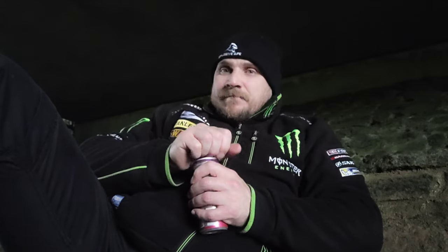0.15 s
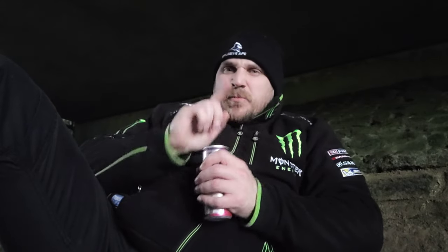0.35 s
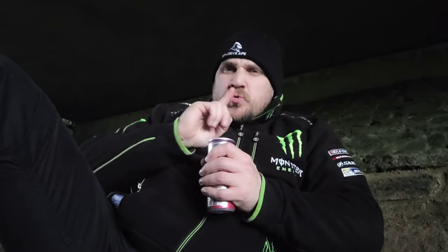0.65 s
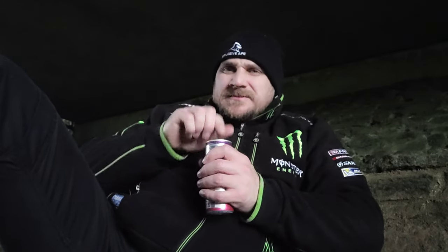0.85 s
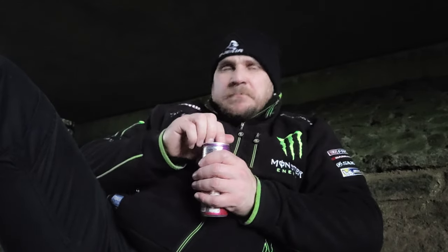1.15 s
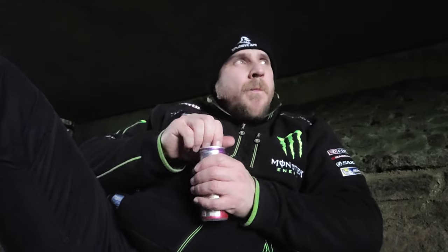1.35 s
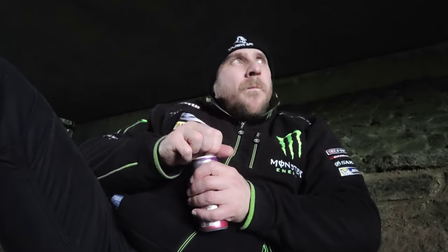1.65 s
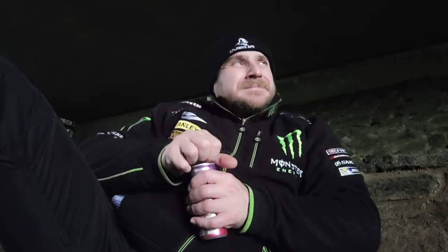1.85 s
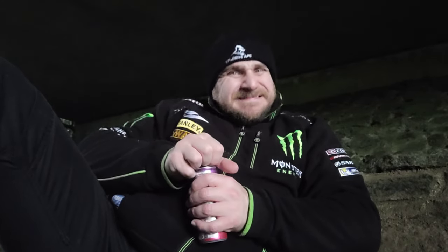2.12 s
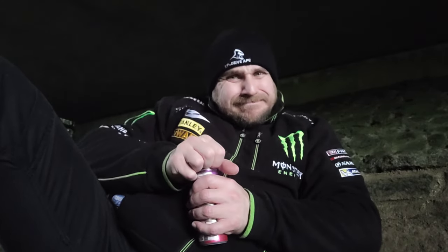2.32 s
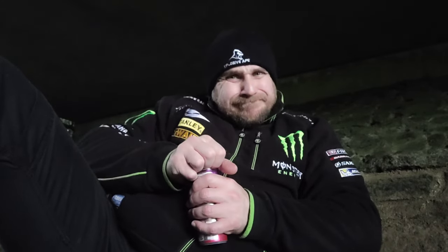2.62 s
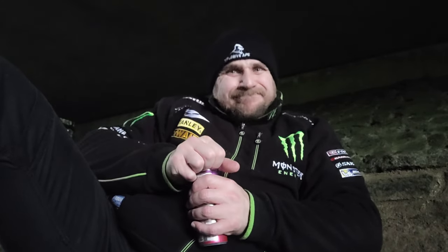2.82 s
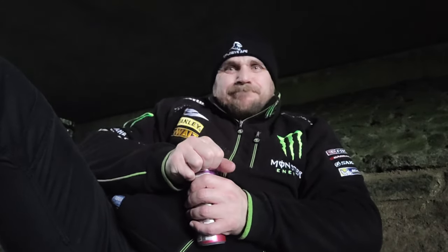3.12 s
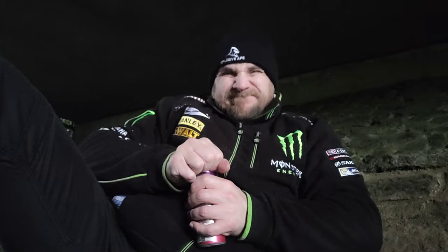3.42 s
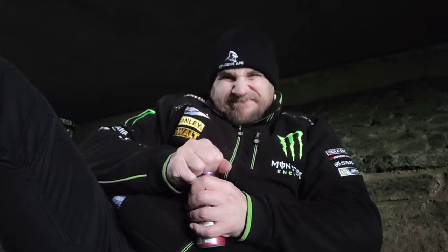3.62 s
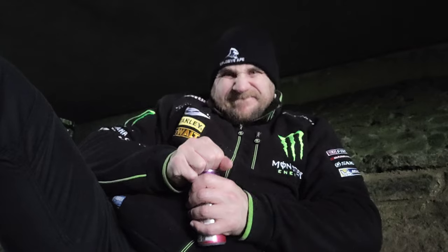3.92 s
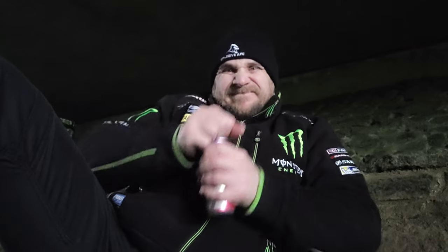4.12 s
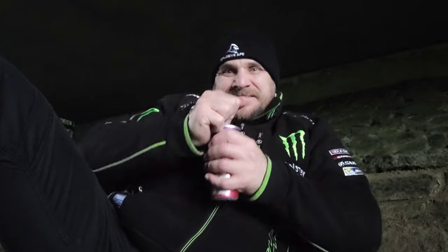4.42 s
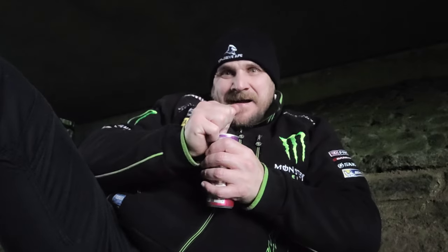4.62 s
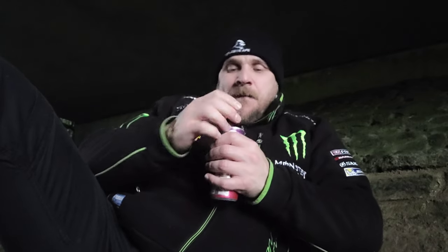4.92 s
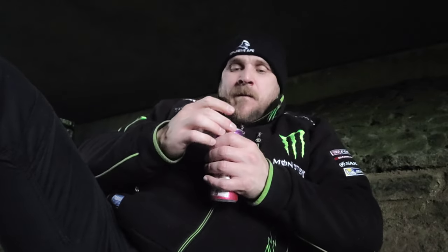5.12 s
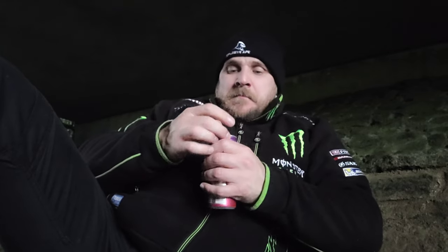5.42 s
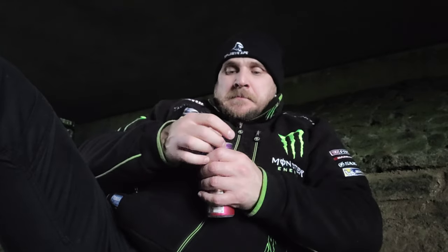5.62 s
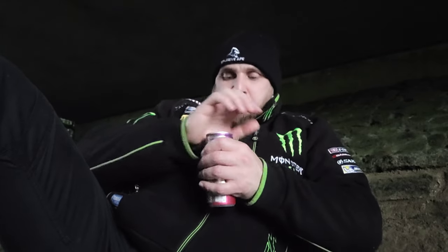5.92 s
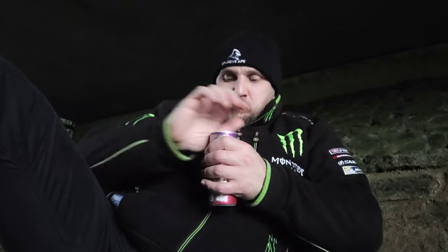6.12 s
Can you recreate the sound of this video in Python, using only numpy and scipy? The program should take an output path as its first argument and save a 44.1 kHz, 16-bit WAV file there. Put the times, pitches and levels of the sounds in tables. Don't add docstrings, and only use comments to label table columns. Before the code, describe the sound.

Sharp can-tab snaps, a brief gas hiss and a tearing crackle ring close by, slapping off stone over distant low road noise.

```python
import sys
import numpy as np
from scipy import signal
from scipy.fft import rfft, irfft
from scipy.io import wavfile

SR = 44100
rng = np.random.default_rng(int(sys.argv[2]) if len(sys.argv) > 2 else 0)


def generate_wav(signal):
    frames = np.transpose(np.atleast_2d(signal))
    scaled = np.clip(frames, -1, 1) * 32767
    pcm = np.round(scaled).astype(np.int16)
    wavfile.write(sys.argv[1], SR, pcm)


def gain_from_decibels(decibels):
    exponent = np.asarray(decibels, float) / 20
    return 10 ** exponent


N = 276066


def rms_one(x):
    return x / np.sqrt(np.mean(x ** 2) + 1e-20)


def at_hz(points, hz):
    table = np.array(points)
    return np.interp(np.log(hz), np.log(table[:, 0]), table[:, 1])


def pan(db):
    return gain_from_decibels(np.array([[.5], [-.5]]) * db)


def drift(rate):
    r = np.exp(-80 * np.pi * rate / SR)
    settled = signal.lfilter([1], [1, -2 * r, r * r], rng.standard_normal(N // 40 + 2002))[2000:]
    return np.interp(np.arange(N) / 40, np.arange(len(settled)), rms_one(settled))


def envelope(start, rise, hold, level_db, fade_db):
    t = np.arange(N) / SR - start
    swell = np.sin(np.pi / 2 * np.clip(t / rise, 0, 1)) ** 2
    return swell * gain_from_decibels(level_db - fade_db * np.maximum(t - rise - hold, 0))


def coloured(spectrum, likeness):
    mid, side = rfft(rng.standard_normal((2, N)))
    hz = np.maximum(np.arange(len(mid)) * SR / N, 1)
    alike = np.clip(at_hz(likeness, hz), -1, 1)
    inside = (hz >= spectrum[0][0]) * (hz <= spectrum[-1][0])
    gain = gain_from_decibels(at_hz(spectrum, hz)) * inside
    pair = np.sqrt(1 + alike) * mid + np.sqrt(1 - alike) * side * [[1], [-1]]
    return rms_one(irfft(gain * pair, N))


# (closest [s], time to double the distance [s], rumble [dB], roar [dB], hiss [dB])
PASSES = [
    (0.1, 0.73, -60, -49, -59),
    (0.62, 0.66, -67, -44, -71),
    (2.3, 0.6, -56.5, -49.5, -73.5),
    (4.6, 0.91, -63.5, -65.5, -61),
    (6.0, 0.87, -47, -40.5, -51.5),
]
# (time [s], half length [s], rumble [dB])
SURGES = [(0.24, 0.058, -42), (1.09, 0.13, -47), (1.743, 0.3, -45.5), (2.49, 0.16, -42.5),
          (3.42, 0.15, -47.5), (3.828, 0.16, -46), (4.353, 0.11, -45.5)]


def road_gains():
    t = np.arange(N) / SR
    power = np.zeros((3, N))
    for closest, width, *levels_db in PASSES:
        power += gain_from_decibels(np.array(levels_db))[:, None] ** 2 / (1 + 3 * ((t - closest) / width) ** 2)
    for s, half, db in SURGES:
        power[0] += gain_from_decibels(2 * db) * np.exp(-((t - s) / half) ** 2)
    return power


# (frequency [Hz], level [dB per Hz])
ENGINE_RUMBLE = [(20, -47), (25, -29.5), (31, -23), (39, -10.5), (50, 1), (62, -2), (80, -2.5), (105, -3.5),
                 (130, -12.5), (170, -17.5), (200, -23.5), (260, -45.5)]
# (frequency [Hz], level [dB per Hz])
TYRE_ROAR = [(76, -29.5), (130, -1), (182, -8), (220, 1.5), (311, -3), (335, -5), (360, -8), (499, -8.5),
             (596, -9.5), (843, -5.5), (1600, -21), (2080, -56.5), (3520, -120)]
# (frequency [Hz], level [dB per Hz])
HIGH_HISS = [(760, -17.5), (1300, -3), (2000, -6.5), (2440, -12.5), (3170, -19), (4500, -21), (5800, -22),
             (7300, -26), (8100, -38), (8700, -37), (10000, -41.5), (15000, -39), (16000, -41.5)]
# (frequency [Hz], width [Hz], level [dB])
IDLE_DRONE = (56, 2.4, -47)
# (frequency [Hz], left-right likeness [-1 to 1])
ROAD_ALIKE = [(60, 0.85), (130, 1), (290, 0.82), (640, 0.27), (1410, -0.3), (3100, 0.054), (6820, -0.043),
              (15000, -0.13)]
# (engine rumble [dB], tyre roar [dB], high hiss [dB])
ROAD_BED = (-48, -49, -63.5)


def traffic():
    hz, width, drone_db = IDLE_DRONE
    r = np.exp(-np.pi * width / SR)
    resonance = [1, -2 * r * np.cos(2 * np.pi * hz / SR), r * r]
    drone = gain_from_decibels(drone_db) * rms_one(signal.lfilter([1, 0, -1], resonance, rng.standard_normal(N)))
    passing = road_gains()
    low, middle, high = np.sqrt(gain_from_decibels(np.array(ROAD_BED))[:, None] ** 2 + passing * [[1], [1], [0]])
    rumble = low * gain_from_decibels(drift(4.6) + 1.5) * coloured(ENGINE_RUMBLE, ROAD_ALIKE)
    roar = middle * gain_from_decibels(0.36 * drift(4.0) - 0.57) * coloured(TYRE_ROAR, ROAD_ALIKE)
    hiss = high * gain_from_decibels(.5 * drift(3.2) + 3.5) * coloured(HIGH_HISS, ROAD_ALIKE)
    dull = signal.butter(1, 3500, fs=SR, output="sos")
    tyres = np.sqrt(passing[2]) * gain_from_decibels(3.0) * signal.sosfilt(dull, coloured(HIGH_HISS, ROAD_ALIKE))
    return pan(-1) * (drone + rumble + roar + hiss + tyres)


def ringing(modes, t, tilt_db, turn=0, damping=1):
    hz, db, t60 = np.transpose(modes)[:, :, None]
    sign = (-1) ** np.arange(len(modes))[:, None]
    strength = sign * gain_from_decibels(db + tilt_db * np.log2(hz / 4000))
    decay = gain_from_decibels(-60 * t * damping / t60)
    wave = np.sin(2 * np.pi * hz * t + turn * np.sqrt(hz / 4000))
    return np.sum(strength * decay * wave, axis=-2)


def cracks(events, modes, low_hz, echo_db, slap_db, click_db, wall=None):
    out = np.zeros((4, N))
    t = np.arange(round(.12 * SR)) / SR
    small_body = signal.butter(3, low_hz, "high", fs=SR, output="sos")
    for s, peak_db, pan_db, tearing, tilt_db in events:
        common, left, right = rng.standard_normal((3, len(t))) * (rng.random((3, len(t))) < .35)
        fading = np.exp(-(t / max(tearing, 1e-4)) ** 4)
        kick = .25 * (common + .6 * np.array([left, right])) * fading + (t == 0)
        turn = .5 * rng.standard_normal((len(modes), 1)) * np.array([1, -1])[:, None, None]
        near = signal.fftconvolve(kick, ringing(modes, t, tilt_db, turn), axes=1)[:, :len(t)]
        near = near / np.abs(near).max() + gain_from_decibels(click_db) * kick
        near = signal.sosfilt(small_body, near)
        near *= pan(pan_db) * gain_from_decibels(peak_db) / np.abs(near.mean(axis=0)).max()
        wide = signal.sosfilt(small_body, ringing(wall or modes, t, .6 * tilt_db, damping=2.0))
        away = gain_from_decibels(echo_db + np.array([[0], [slap_db]])) * rms_one(wide) * near.std()
        at = round((s + .0005) * SR)
        out[:, at:at + len(t)] += np.vstack([near, away])
    return out


# (time [s], peak [dB], left-right [dB], tearing [s], tilt [dB per octave])
NAIL_SLIP = [
    (0.2319, -25, -3.5, 0.0017, -1.5),
]
# (frequency [Hz], level [dB], t60 [s])
SLIP_MODES = [(2190, -1, 0.019), (3400, -11.5, 0.012), (4380, -3, 0.034), (5720, -4, 0.014),
              (6460, -3, 0.0047), (8130, -8.5, 0.0067), (11900, -25, .004), (14800, -20, .004)]


def nail_slip():
    return cracks(NAIL_SLIP, SLIP_MODES, low_hz=1490, echo_db=-6.5, slap_db=-8, click_db=-18)


# (start [s], rise [s], hold [s], level [dB], fade [dB per s])
STROKES = [(0.242, 0.008, 0.01, -74.5, 68), (1.62, 0.09, 0.03, -80, 58), (4.298, 0.076, 0.012, -85, 200),
           (4.42, 0.15, 0.02, -82, 45), (4.813, 0.006, 0.005, -75, 121), (4.902, 0.027, 0.005, -81, 90),
           (5.08, 0.05, 0.02, -86, 90), (5.554, 0.058, 0.01, -74.5, 96.5), (5.8, 0.08, 0.13, -82, 102.5),
           (6.03, 0.06, 0.086, -66, 300), (6.2, 0.022, 0.1, -81, 102)]
# (frequency [Hz], level [dB per Hz])
CLOTH = [(2940, -31.5), (5000, -6.5), (6130, -17), (6660, -4), (8920, -6), (10700, -2), (14800, -1.5),
         (16000, -10)]


def sleeve():
    strokes = sum(envelope(*stroke) for stroke in STROKES)
    return strokes * gain_from_decibels(drift(40)) * coloured(CLOTH, [(5000, .2), (16000, .3)])


# (time [s], peak [dB], tilt [dB per octave])
FINGER_TICKS = [(0.627, -57, -6), (1.2087, -54, -4), (1.222, -55, -4), (1.292, -54, -4), (4.466, -59, 5),
                (4.518, -60, -3), (4.584, -62, 1), (4.665, -61, 1), (4.8444, -59, .1), (4.9344, -60, .1),
                (5.212, -61, 1), (5.6124, -57, 3)]
# (frequency [Hz], level [dB], t60 [s])
LID_MODES = [(2540, -5, 0.0088), (3630, -5, 0.01), (5570, -1, 0.0053), (7300, -3.5, 0.0022),
             (10280, -9, 0.002), (12000, 1, 0.0018), (14300, -0.5, 0.002)]
# (frequency [Hz], level [dB], t60 [s])
LID_WALL = [(2570, -3.5, .006), (3800, -1, .004), (5510, 1, .003), (7000, -4, .003), (10200, -4, .002),
            (12180, -1, 0.0017), (14300, -3, 0.0022)]


def lid_cracks(events):
    return cracks(events, LID_MODES, low_hz=1570, echo_db=-7.0, slap_db=-2, click_db=-9.5, wall=LID_WALL)


def fingertips():
    return lid_cracks([(s, db, -1.5, .0012, tilt_db) for s, db, tilt_db in FINGER_TICKS])


# (time [s], peak [dB], left-right [dB], tearing [s], tilt [dB per octave])
VENT_SNAP = [
    (2.2115, -3.5, -2, 0.00038, .1),
]
# (frequency [Hz], level [dB], t60 [s])
VENT_MODES = [(2080, -8, 0.013), (3052, -2, 0.007), (4428, -2, .014), (4710, -9, .007), (6200, 0, .009),
              (8060, -24, .004), (9360, -12, 0.0036), (10690, -14.5, 0.0057), (12400, -10.5, .005),
              (14070, -14, 0.0071)]
# (frequency [Hz], level [dB], t60 [s])
VENT_WALL = [(2050, -6, .01), (3100, 0, .008), (4400, 1, .014), (6270, -10.5, .007), (9900, -14.5, .005),
             (12300, -24, .005)]


def vent_snap():
    return cracks(VENT_SNAP, VENT_MODES, low_hz=1400, echo_db=-5.5, slap_db=-3.5, click_db=-4, wall=VENT_WALL)


# (frequency [Hz], level [dB])
VENT_JET = [(1800, -24), (2400, -21), (3000, -16), (3800, -18), (5600, -14.5), (7000, -12), (8000, -7),
            (9000, -15), (10000, -12.5), (10500, -16.5), (12100, -5), (13100, -10), (14700, 1), (16000, -2)]
# (frequency [Hz], left-right likeness [-1 to 1])
JET_ALIKE = [(2000, .2), (5000, 0.2), (16000, .55)]


def gas():
    open_s, rise_s, shut_s, knee_s = 2.212, 0.07, 2.531, 0.021
    level_db, fade_db_per_s = -34.5, 332
    t = np.arange(N) / SR
    spent = knee_s * np.logaddexp(0, (t - shut_s) / knee_s)
    flow = np.clip((t - open_s) / rise_s, 0, 1) * gain_from_decibels(level_db - fade_db_per_s * spent)
    return pan(-1.2) * flow * gain_from_decibels(1.2 * drift(25) - 1.8) * coloured(VENT_JET, JET_ALIKE)


# (time [s], peak [dB], left-right [dB], tearing [s], tilt [dB per octave])
RIVET_CREAKS = [
    (3.3395, -40.5, -3, 0.00091, -10),
    (3.3680, -20.5, 0, 0.00085, -2),
    (3.3803, -9.5, -4.5, 0.0011, 4.5),
    (3.3975, -32.5, -7, 0.0006, 0),
    (3.4038, -35.5, -2.5, 0.00072, 10),
    (3.5003, -38.5, -1.8, .001, -2),
    (3.5137, -33.5, -1.5, 0.0023, 2.5),
    (3.5603, -45, 2.5, .001, -8.5),
    (5.5465, -42.5, 1, 0.0011, -3),
]


def rivet_creaks():
    return lid_cracks(RIVET_CREAKS)


# (time [s], peak [dB], tearing [s])
TEAR = [(3.5912, -33, .002), (3.5963, -27, .0012), (3.6005, -40, .005), (3.6070, -21, .002),
        (3.6098, -25, .002), (3.6132, -13, .0015), (3.6150, -13, .002), (3.6183, -10, .001),
        (3.6198, -9.5, .0015), (3.6222, -17, .002), (3.6243, -12, .001), (3.6262, -19, .0012)]
# (frequency [Hz], level [dB], t60 [s])
TEAR_MODES = [(424, -18, 0.0073), (1828, -23, 0.18), (2486, 3, .008), (3670, 1.5, 0.00512),
              (4000, -2, .005), (5500, -3.5, 0.0046), (7500, -6, 0.0038), (11360, -4.5, 0.00457),
              (13800, -3.5, 0.0023)]
# (frequency [Hz], level [dB], t60 [s])
TEAR_WALL = [(1750, -7, 0.027), (2500, 2.5, 0.0079), (3440, 7.5, 0.0021), (4270, -0.5, 0.0097),
             (5470, -7.5, 0.0044), (7400, -5, 0.0043), (11000, -5, 0.0029), (13780, -6, .003)]


def score_tear():
    events = []
    for s, db, length in TEAR:
        tilt_db = np.clip(0.3 * (db + 15), -2, 2)
        events.append((s, db, -2.6, length, tilt_db))
    return cracks(events, TEAR_MODES, low_hz=246, echo_db=-5.0, slap_db=-4.0, click_db=-11, wall=TEAR_WALL)


# (time [s], peak [dB], left-right [dB], tearing [s], tilt [dB per octave])
TAB_TICK = [
    (4.7998, -33, -5, 0.00018, .1),
]
# (frequency [Hz], level [dB], t60 [s])
TICK_MODES = [(1333, -2, 0.044), (2920, -7, 0.011), (4070, 8.5, 0.039), (4167, 6.5, 0.0203),
              (7170, -15, .005), (11900, -10, .004)]


def tab_tick():
    return cracks(TAB_TICK, TICK_MODES, low_hz=903, echo_db=-12, slap_db=-1, click_db=-14)


# (time [s], peak [dB], left-right [dB], tearing [s], tilt [dB per octave])
TAB_SNAP = [
    (5.2770, -1, -6.5, 0.000245, 0.063),
]
# (frequency [Hz], level [dB], t60 [s])
SNAP_MODES = [(1550, -9, .008), (2150, 0, .011), (2430, -3, .010), (3600, -17, .012), (4850, -5, .009),
              (5600, -12, .006), (6697, -11, .007), (7600, -19, .005), (9800, -25, .004),
              (11300, -23, .004), (13200, -26, .004), (14800, -23, .004)]
# (frequency [Hz], level [dB], t60 [s])
SNAP_WALL = [(1720, -0.5, 0.0062), (2600, 1.5, 0.0097), (3580, -7.5, 0.02), (4870, -8, 0.012),
             (7100, -7.5, 0.0043), (9500, -15.5, 0.004), (11300, -14.5, 0.014), (13270, -15.5, .006),
             (14930, -18.5, .006)]


def tab_snap():
    return cracks(TAB_SNAP, SNAP_MODES, low_hz=1080, echo_db=-1.5, slap_db=-1.3, click_db=-14, wall=SNAP_WALL)


def nearby(x):
    t = np.arange(round(.03 * SR)) / SR
    scatter = rng.standard_normal((2, len(t))) * np.exp(-t / 0.0024) * (t > .0004)
    scatter *= gain_from_decibels(-8) / np.sqrt(np.sum(scatter ** 2, axis=1, keepdims=True))
    return x + signal.fftconvolve(x, scatter, axes=1)[:, :N]


# (delay [s], left [dB], right [dB])
ECHOES = [
    (0.0145, -11, -17),
    (0.018, -13.5, -17),
    (0.03, -21, -22.5),
    (.034, -20, -22.5),
    (0.126, -40, -37),
]
# (frequency [Hz], t60 [s])
ARCH_T60 = [(1000, .6), (2500, .55), (5000, .5), (9000, .38), (12000, .33), (15000, .3)]
# (frequency [Hz], level [dB])
ARCH_COLOUR = [(1000, 2), (2000, 0.5), (3200, 0.9), (5000, 2.2), (8000, 3.5), (11000, 3), (15000, 2)]


def arch(x, facing):
    tail_db, tail_start_s, tail_rise_s = -12, 0.017, 0.024
    t = np.arange(round(.8 * SR)) / SR
    common, own = rng.standard_normal(len(t)), rng.standard_normal((2, len(t)))
    tail = np.zeros((2, len(t)))
    edges = 700 * 2 ** np.arange(0, 4.7, .33)
    for low, high in zip(edges, edges[1:]):
        band_pass = signal.butter(2, [low, high], "band", fs=SR, output="sos")
        band = signal.sosfilt(band_pass, 0.14 * common + own)
        hz = np.sqrt(low * high)
        tail += band * gain_from_decibels(at_hz(ARCH_COLOUR, hz) - 60 * t / at_hz(ARCH_T60, hz))
    tail *= np.clip((t - tail_start_s) / tail_rise_s, 0, 1)
    tail *= gain_from_decibels(tail_db) / np.sqrt(np.sum(tail ** 2, axis=1, keepdims=True))
    slaps = np.zeros((2, len(t)))
    for delay, left_db, right_db in ECHOES:
        smear = np.exp(-np.maximum(t - delay, 0) / 0.0016) * (t >= delay) * (1.5 * common + own)
        smear /= np.sqrt(np.sum(smear ** 2, axis=1, keepdims=True))
        slaps += gain_from_decibels(np.array([[left_db], [right_db]])) * smear
    dulled = signal.lfilter(*signal.butter(1, 8000, fs=SR), facing)
    reply = signal.fftconvolve(x[None], tail, axes=1) + signal.fftconvolve(dulled[None], slaps, axes=1)
    return reply[:, :N]


def scene():
    can = nail_slip() + fingertips() + vent_snap() + rivet_creaks() + score_tear() + tab_tick() + tab_snap()
    jet = gas()
    to_arch = can[2] + gain_from_decibels(-11) * jet[0]
    return traffic() + sleeve() + jet + nearby(can[:2]) + arch(to_arch, can[3])


def top_cut(x):
    return signal.sosfilt(signal.butter(12, 17010, fs=SR, output="sos"), x)


def record(dry):
    notch_hz, notch_width_hz, top_hz, ceiling = 8700, 700, 15950, .93
    notched = signal.lfilter(*signal.iirnotch(notch_hz, notch_hz / notch_width_hz, SR), dry)
    dipped = dry - 0.46 * (dry - notched)
    limited = dipped / (1 + np.abs(dipped / ceiling) ** 6) ** (1 / 6)
    cut = signal.sosfilt(signal.cheby2(10, 28, top_hz, fs=SR, output="sos"), limited)
    return top_cut(cut)


dry = scene()
out = record(dry)
generate_wav(out)
```